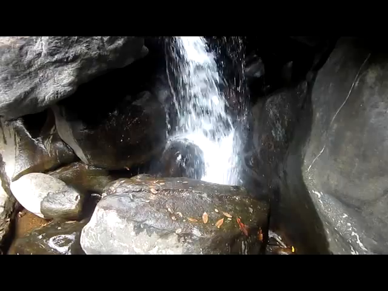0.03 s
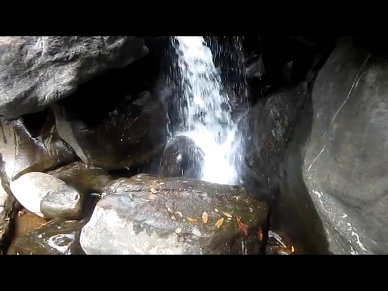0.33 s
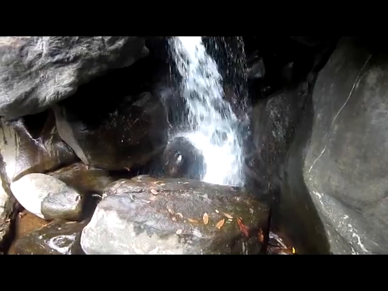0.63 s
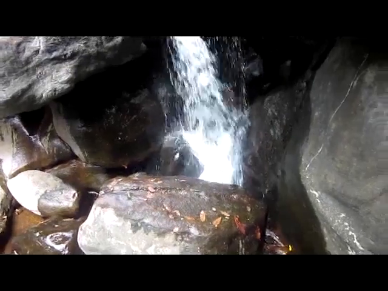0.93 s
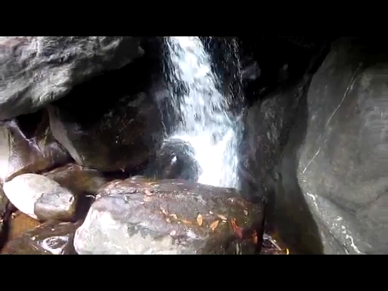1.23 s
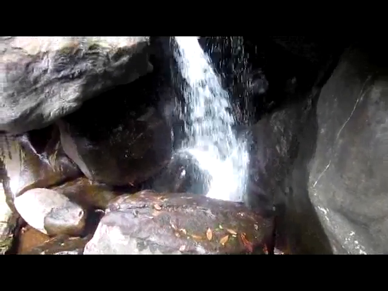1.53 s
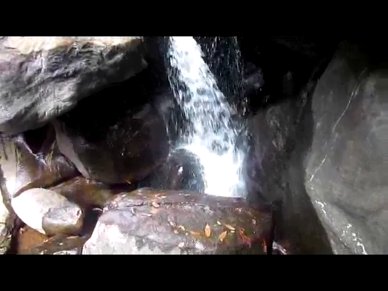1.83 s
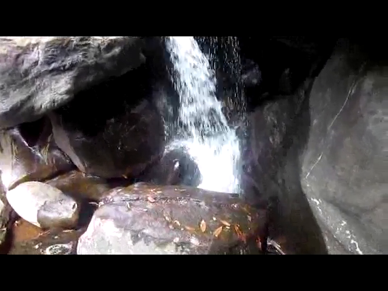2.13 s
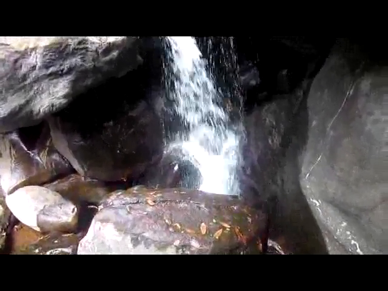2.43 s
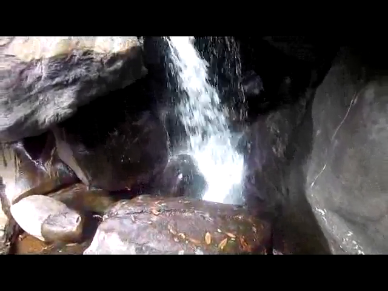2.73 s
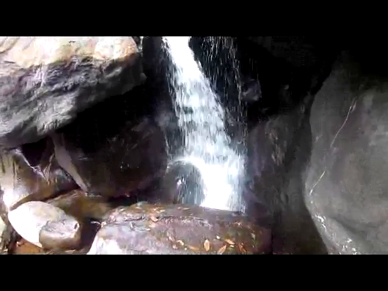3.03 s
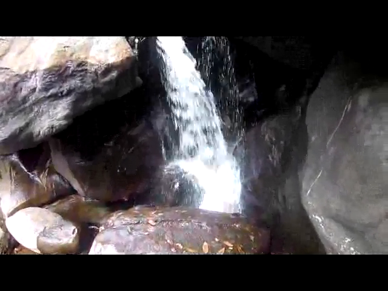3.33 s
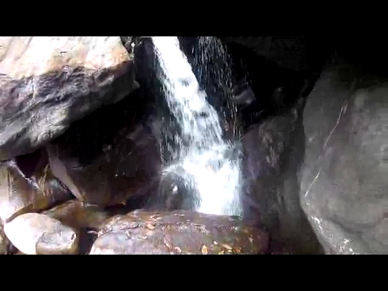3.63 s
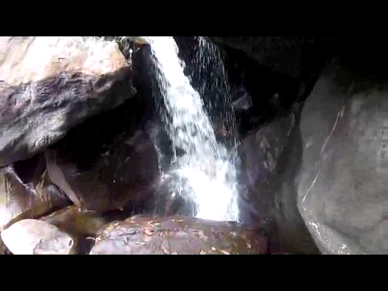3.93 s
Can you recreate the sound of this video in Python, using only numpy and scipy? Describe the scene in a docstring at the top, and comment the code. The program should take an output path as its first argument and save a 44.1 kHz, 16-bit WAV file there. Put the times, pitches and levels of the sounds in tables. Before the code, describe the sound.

A small waterfall pours onto boulders in a rocky recess, a few metres from the microphone. Its bright, steady rush carries crackling droplets and irregular splashes throughout, with faint gurgles and a few plinks from the pool.

```python
"""A small waterfall drops onto wet boulders in a rocky recess, a few metres from a mono microphone.
The uneven stream makes a bright rush of spray and droplet crackle, and clumps of water slap the
stone. Trapped air tinkles, gulps and plinks in the pool over a faint rumble, while the churning
water sets the hollow between the rocks ringing."""
import sys
import numpy as np
from scipy import signal
from scipy.fft import rfft, irfft
from scipy.io import wavfile
from scipy.ndimage import uniform_filter1d

SR = 44100
rng = np.random.default_rng(int(sys.argv[2]) if len(sys.argv) > 2 else 0)


def unload_wav(signal):
    """Save mono or channel-first audio to the path in sys.argv[1] as 16-bit WAV at rate SR, clipped to [-1, 1]."""
    wavfile.write(
        sys.argv[1],
        SR,
        np.round(np.clip(np.atleast_2d(signal).T, -1, 1) * 32767).astype(np.int16),
    )


N = 176400


def from_db(db):
    """Decibels to gain."""
    return 10 ** (np.asarray(db) / 20)


def rms_one(x):
    """Scale to rms 1."""
    return x / np.sqrt(np.mean(x ** 2) + 1e-20)


def seconds():
    """Time of every sample."""
    return np.arange(N) / SR


def drift(rate_hz):
    """Smooth random wandering with spread 1, mostly slower than rate_hz."""
    step, settle = 20, 4000
    pole = np.exp(-2 * np.pi * rate_hz * step / SR)
    noise = rng.standard_normal(N // step + settle + 2)
    slow = signal.lfilter([1], [1, -2 * pole, pole * pole], noise)[settle:]
    return np.interp(np.arange(N) / step, np.arange(len(slow)), rms_one(slow))


def coloured(x, colour):
    """Filter by a curve of (Hz, dB) points joined on a log-frequency axis; rms 1."""
    points_hz, points_db = np.transpose(colour)
    hz = np.maximum(np.fft.rfftfreq(N, 1 / SR), 1)
    gain = from_db(np.interp(np.log(hz), np.log(points_hz), points_db))
    return rms_one(irfft(rfft(x) * gain, N))


def ring(x, hz, t60):
    """A damped resonance that falls 60 dB in t60 seconds."""
    radius, angle = from_db(-60 / (t60 * SR)), 2 * np.pi * hz / SR
    return signal.lfilter([1, 0, -1], [1, -2 * radius * np.cos(angle), radius * radius], x + 1e-18)


def grains(per_s, low_hz, high_hz, cycles, spread_db, pitches):
    """Tiny random pulsations, each swelling and dying at one of many pitches; rms 1."""
    sizes = from_db(spread_db * np.minimum(rng.exponential(1, N), 3))
    signs = rng.choice([-1, 1], N)
    clicks = sizes * signs * (rng.random(N) < per_s / SR)
    pitch_index = rng.integers(0, pitches, N)
    out = np.zeros(N)
    for k, hz in enumerate(np.geomspace(low_hz, high_hz, pitches)):
        struck = ring(clicks * (pitch_index == k), hz, cycles / hz)
        out += rms_one(ring(struck, hz, cycles / hz))  # ringing twice softens the attack
    return rms_one(out)


# Strength of the stream hitting the rocks. Each row: time in seconds, level in dB.
FLOW = [(0, 1.5), (.4, -0.3), (.7, 0.7), (.9, -0.04), (1.1, 0.65), (1.28, 0.8), (1.4, 0), (1.62, 2),
        (1.74, 0.7), (1.97, 1.64), (2.1, 0.06), (2.28, 0.8), (2.68, 1), (3.04, 0.8), (3.26, 1.3),
        (3.38, 0.5), (3.6, 1.6), (3.66, 0.8), (3.82, 1), (4, 1.4)]
# The stream thins for a moment. Each row: centre in seconds, dip in dB, half length in seconds.
LULLS = [(0.546, -1.5, .014), (1.394, -3, 0.022), (1.558, -4, 0.013), (2.058, -3.5, 0.018),
         (2.572, -4.5, 0.019), (3.033, -1.8, 0.014), (3.094, -2.5, 0.015), (3.421, -1, 0.018),
         (3.647, -0.3, 0.011), (3.936, -2.1, 0.023)]

def stream():
    """Strength of the falling water in dB: slow swell, lulls and quick surges that even out."""
    t = seconds()
    surge_db, even_out_s = 0.51, 0.1
    swell = np.interp(t, *np.transpose(FLOW))
    lulls = sum(db * np.exp(-((t - centre) / half) ** 2) for centre, db, half in LULLS)
    surges = drift(rate_hz=24)
    surges = rms_one(surges - uniform_filter1d(surges, int(even_out_s * SR)))
    return swell + lulls + surge_db * surges


# Colour of the spray at the microphone. Each row: frequency in Hz, relative level in dB.
SPRAY_COLOUR = [(30, -30.5), (70, -37.5), (150, -33), (195, -13), (480, -14.5), (700, -11.5), (950, -9),
                (1650, -9), (2000, -5), (2350, -5.2), (2850, -1.8), (3500, -0.3), (3900, -1.5), (4500, 1),
                (5050, -1.4), (5500, -4.5), (5950, -11), (6500, -14.5), (7050, -20.5), (7600, -42.5)]

def spray(flow_db):
    """Countless impacts on the boulders merge into a rush; each half octave flickers on its own."""
    white, hz = rfft(rng.standard_normal(N)), np.fft.rfftfreq(N, 1 / SR)
    half_octave = np.floor(2 * np.log2(np.clip(hz, 150, 7000) / 150))
    hiss = np.zeros(N)
    for k in np.unique(half_octave):
        hiss += irfft(white * (half_octave == k), N) * from_db(0.5 * drift(rate_hz=25))
    spatter_db = 0.84 * drift(rate_hz=220)  # finer break-up of the stream
    return from_db(-24 + flow_db + spatter_db) * coloured(hiss, SPRAY_COLOUR)


def droplets(flow_db):
    """Drops nearer the microphone crackle on the stone, thicker when the stream is strong."""
    per_s = 6000 * from_db(2 * flow_db)
    crackle = grains(per_s, low_hz=1500, high_hz=5780, cycles=5.8, spread_db=3, pitches=22)
    return from_db(-28.5) * coloured(crackle, SPRAY_COLOUR)


def splash_envelope(power, attack_s=0.0043, decay_s=0.016):
    """Amplitude of splashes: every burst of power rises quickly and leaves a short tail."""
    t = seconds()[:SR // 4]
    shape = (1 - np.exp(-t / attack_s)) * np.exp(-t / decay_s)
    splash_power = signal.fftconvolve(power, (shape / shape.max()) ** 2)[:len(power)]
    return np.sqrt(np.abs(splash_power))


# Colour of the many small slaps on the stone. Each row: frequency in Hz, relative level in dB.
SMALL_SLAP_COLOUR = [(100, -33.5), (450, -9.5), (900, -2), (1400, -0.5), (2000, -3), (3000, 0.5),
                     (5000, -6), (6200, -17), (8000, -29)]

def small_slaps(per_s=65):
    """Little clumps of water keep bursting on the rock at random."""
    hits = rng.random(N) < per_s / SR
    sizes = from_db(-40 + 2 * rng.standard_normal(N))
    return splash_envelope(hits * sizes ** 2) * coloured(rng.standard_normal(N), SMALL_SLAP_COLOUR)


def foam(flow_db):
    """Small bubbles ring in the foam on the pool, more of them when the stream is strong."""
    per_s = 500 * from_db(2 * flow_db)
    bubbles = grains(per_s, low_hz=672.5, high_hz=2534, cycles=17.3, spread_db=0, pitches=26)
    return from_db(-40.5) * bubbles


def tinkle(flow_db):
    """The tiniest bubbles ring high and glitter in the spray."""
    per_s = 700 * from_db(2 * flow_db)
    bubbles = grains(per_s, low_hz=2600, high_hz=5196, cycles=33, spread_db=1, pitches=30)
    return from_db(-32) * bubbles


# Resonances of the hollow between the rocks. Each row: frequency in Hz, width in Hz, level in dB.
HOLLOW = [(197, 27, -59.5), (246, 21, -58), (308, 25, -58.5), (436, 24, -61.5), (632, 27, -51),
          (890, 61, -49.5)]

def hollow(churn_db=3.5):
    """The churning water stirs each resonance of the hollow unevenly."""
    out = np.zeros(N)
    for hz, width_hz, db in HOLLOW:
        resonance = ring(rng.standard_normal(N), hz, t60=np.log(1000) / (np.pi * width_hz))
        churn = from_db(churn_db * drift(rate_hz=20))
        out += from_db(db) * rms_one(resonance * churn)
    return out


# Colour of the rumble at the foot of the fall. Each row: frequency in Hz, relative level in dB.
RUMBLE_COLOUR = [(20, 0), (45, -3.5), (68, -6.5), (85, -7.5), (97, 3), (114, -8), (155, -1.5), (200, -14.5),
                 (300, -39)]

def rumble(flutter_db=6):
    """The plunge into the pool makes a faint rumble that flutters and briefly drops away."""
    flutter = rms_one(from_db(flutter_db * np.minimum(drift(rate_hz=20), 0.5)))
    return from_db(-57) * flutter * coloured(rng.standard_normal(N), RUMBLE_COLOUR)


# The heaviest clumps landing on the boulders, a few metres off.
# Each row: start in seconds, level in dB, centre of the splash in Hz.
HEAVY_SLAPS = [(.155, -29, 1100), (.308, -26, 1300), (.42, -24.5, 1900), (.588, -28.5, 1200),
               (1.075, -22, 2900), (1.121, -35, 1500), (1.255, -25, 1920), (1.345, -28, 2400),
               (1.476, -28, 1290), (1.586, -29.5, 1300), (1.807, -24, 2300), (1.892, -28.5, 2080),
               (1.967, -34, 1000), (2.002, -27.5, 3930), (2.458, -29, 1800), (2.625, -25.5, 2400),
               (2.734, -34, 3400), (2.886, -29.5, 1800), (2.995, -32, 900), (3.064, -30.5, 2600),
               (3.278, -22, 3800), (3.294, -27, 1750), (3.465, -22, 3500), (3.708, -29.5, 1600),
               (3.815, -27, 1710), (3.83, -24.5, 2800), (3.962, -27, 2900)]

def heavy_slaps(width_octaves=0.85, top_hz=5400):
    """Heavy clumps splash on the rock, each a burst of noise in a broad band of its own."""
    out, size = np.zeros(N + SR), SR // 4
    envelope = splash_envelope(signal.unit_impulse(size))
    hz = np.fft.rfftfreq(size, 1 / SR) + 1
    rolloff = 1 / (1 + (hz / top_hz) ** 10)
    for start_s, db, centre_hz in HEAVY_SLAPS:
        band = np.exp(-0.5 * (np.log2(hz / centre_hz) / width_octaves) ** 2)
        splash = irfft(rfft(rng.standard_normal(size)) * band * rolloff, size)
        start = int(start_s * SR)
        out[start:start + size] += from_db(db) * envelope * rms_one(splash)
    return out[:N]


def single_bubbles(rows, rise_s, glide_per_s):
    """Each pocket of air swells, rings unevenly with a slightly rising pitch and dies."""
    out = np.zeros(N)
    for start_s, hz, db in rows:
        age = np.maximum(seconds() - start_s, 0)
        swell = age / rise_s * np.exp(1 - age / rise_s)
        phase = 2 * np.pi * hz * age * (1 + glide_per_s * age / 2)
        out += from_db(db) * swell * np.sin(phase)
    wobble = rms_one(from_db(1.5 * drift(rate_hz=60)))  # the water around jostles the bubbles
    return out * wobble


# Big air pockets in the pool. Each row: start in seconds, starting pitch in Hz, level in dB.
GULPS = [(.272, 885, -35), (.635, 636, -36), (0.699, 305, -38), (0.762, 220, -40.5), (1.125, 673, -37),
         (1.655, 246, -44), (1.888, 907, -37.5), (1.968, 872, -35), (2.15, 296, -33), (2.245, 398, -42),
         (2.395, 633, -37), (2.972, 900, -37)]

def gulps():
    """Big pockets of trapped air swell and ring low under the fall."""
    return single_bubbles(GULPS, rise_s=0.012, glide_per_s=0.9)


# Fat drops landing in the pool. Each row: start in seconds, starting pitch in Hz, level in dB.
PLINKS = [(1.972, 1975, -23), (3.062, 2300, -19), (3.07, 2600, -21), (3.3, 1930, -27)]

def plinks():
    """Each fat drop traps a bubble that rings high and briefly."""
    return single_bubbles(PLINKS, rise_s=0.0033, glide_per_s=0.84)


def scene():
    """The waterfall from one spot a few metres away, the same in both channels."""
    flow_db = stream()
    on_rocks = spray(flow_db) + droplets(flow_db) + small_slaps() + heavy_slaps()
    in_pool = foam(flow_db) + hollow() + rumble() + gulps() + plinks()
    water = on_rocks + in_pool + tinkle(flow_db)
    return np.stack([water, water])


def record(dry):
    """A narrow-band recorder with a small constant offset; the sound cuts in low and swells."""
    start_s, edge_s = 0.059, 0.0032
    opening_db, swell_s = -8, 0.083
    offset, cutoff_hz = -0.0112, 8050
    t = seconds()
    age = np.maximum(t - start_s, 0)
    gate = np.clip(np.minimum(age, t[-1] - t) / edge_s, 0, 1)  # cuts in and out
    swell = from_db(opening_db * np.exp(-age / swell_s))
    lowpass = signal.cheby2(20, 70, cutoff_hz, fs=SR, output="sos")
    return signal.sosfilt(lowpass, gate * (dry * swell + offset))


dry = scene()
out = record(dry)
unload_wav(out)
```